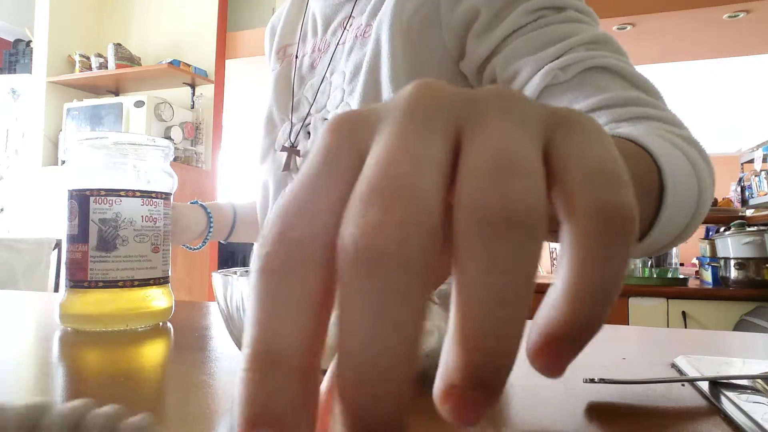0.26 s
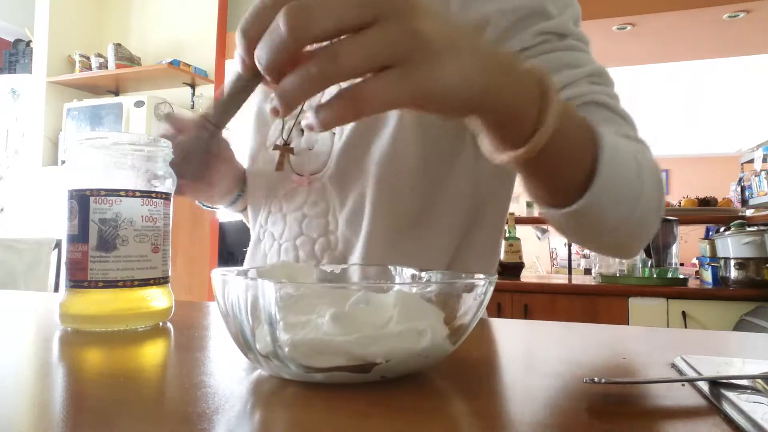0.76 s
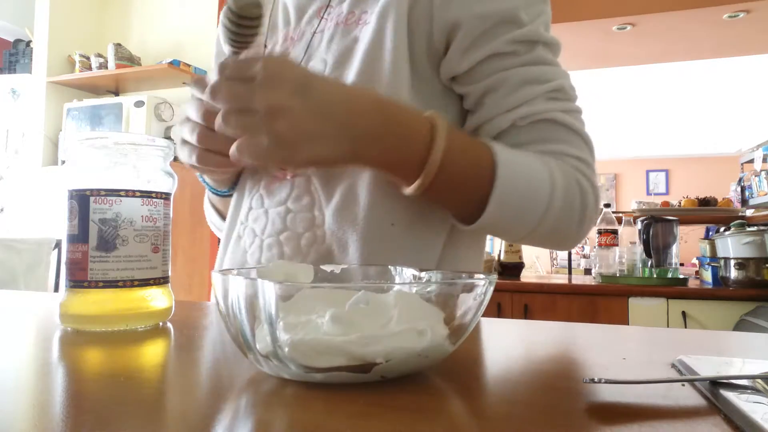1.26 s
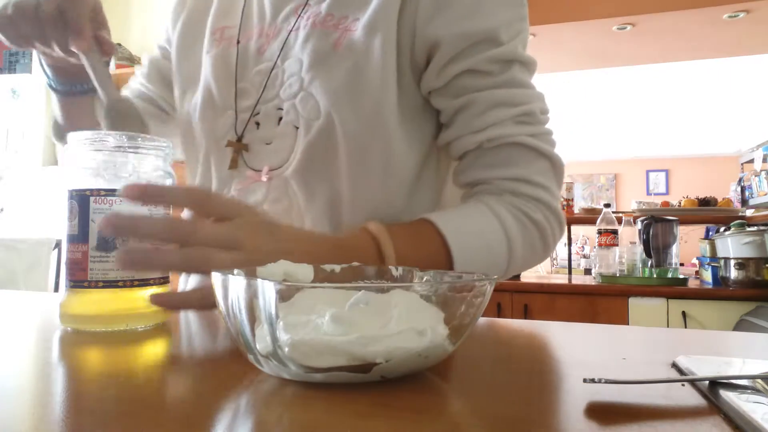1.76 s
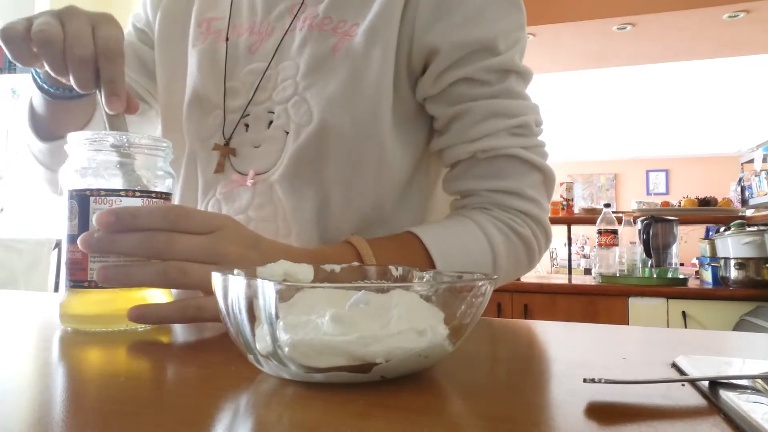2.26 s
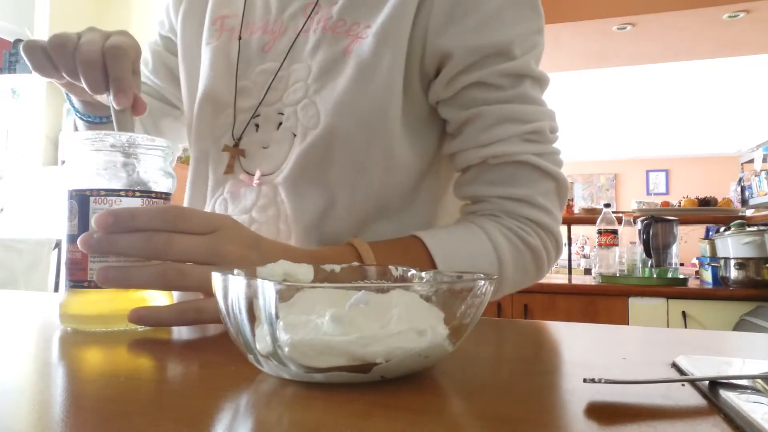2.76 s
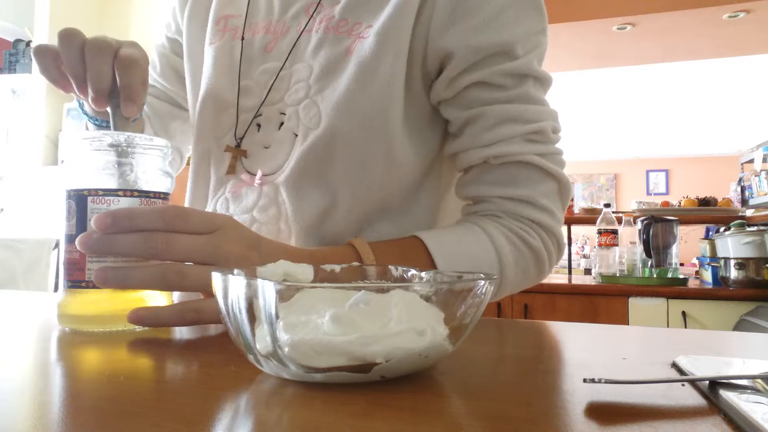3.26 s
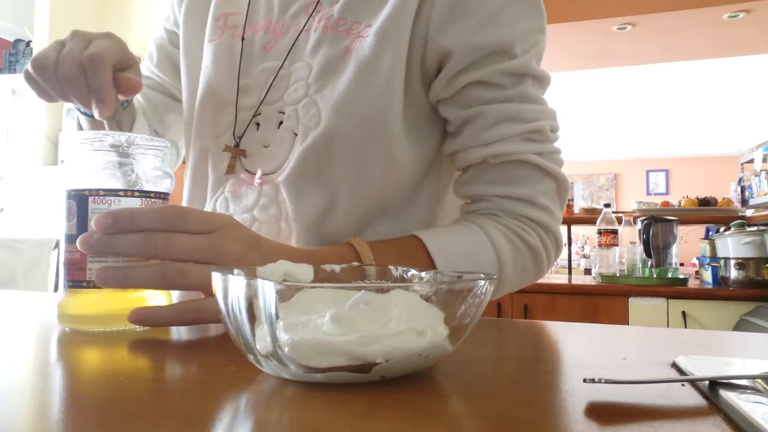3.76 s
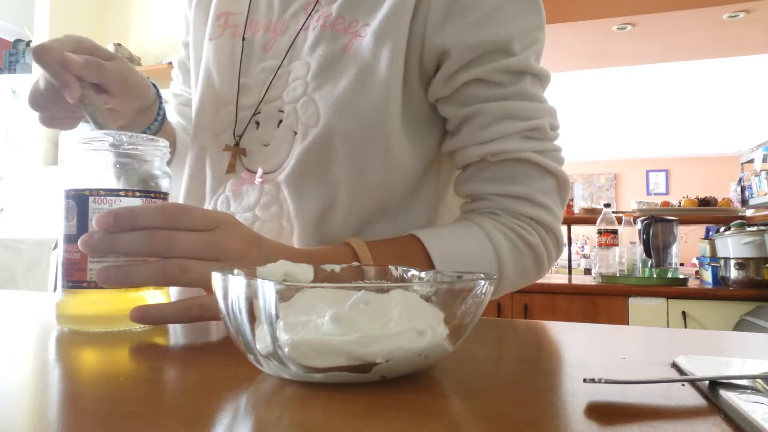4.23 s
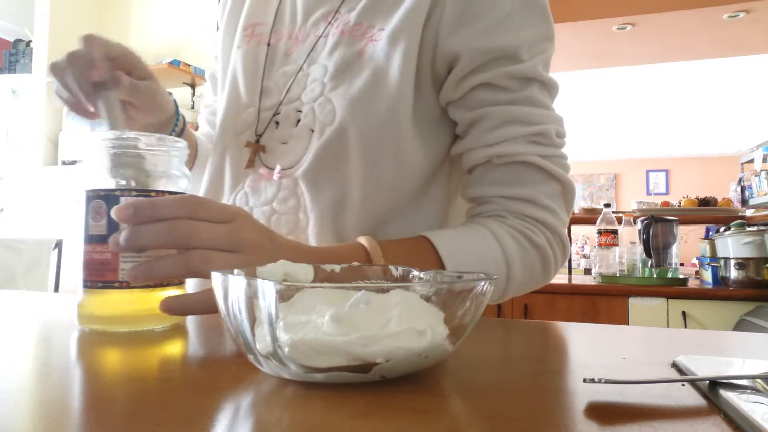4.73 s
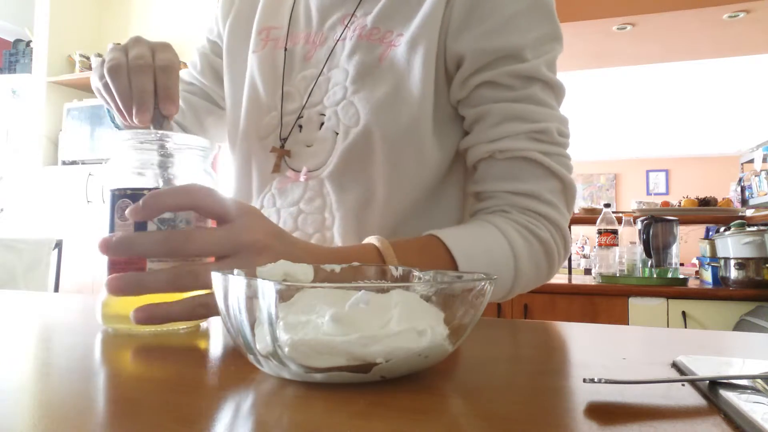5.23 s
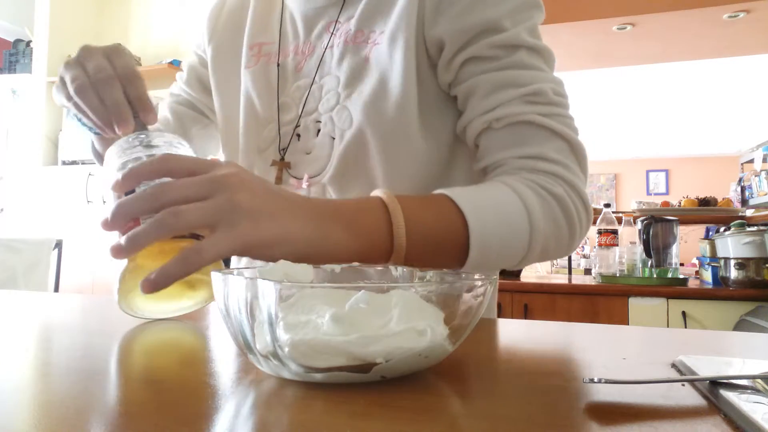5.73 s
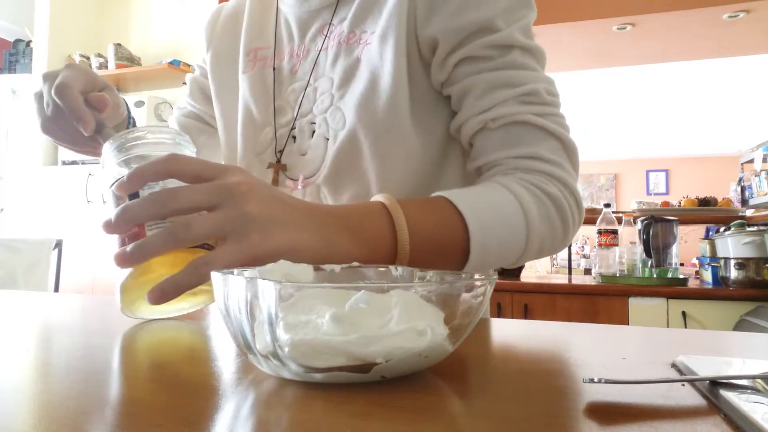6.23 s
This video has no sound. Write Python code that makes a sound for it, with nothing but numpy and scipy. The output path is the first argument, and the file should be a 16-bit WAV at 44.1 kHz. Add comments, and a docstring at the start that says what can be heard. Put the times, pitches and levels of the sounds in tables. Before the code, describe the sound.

Wooden knocks and a bright spoon clink, faint stirring in a glass jar, then dull bumps as the jar shifts on a table.

```python
"""Honey dipper, spoon and jar on a table

A wooden honey dipper is dragged off a wooden kitchen table, and a metal spoon clinks and bounces.
The dipper ticks on the rim of a glass jar and stirs; the jar rocks and slides on its base.
A phone lying on the table hears mostly the dull ring of the wood, over room rumble and microphone hiss."""
import sys
import numpy as np
from scipy import signal
from scipy.fft import rfft, irfft, next_fast_len
from scipy.io import wavfile
from scipy.ndimage import uniform_filter1d

SR = 44100
rng = np.random.default_rng(int(sys.argv[2]) if len(sys.argv) > 2 else 0)


def transcribe(u):
    """Save the signal u as a 16-bit wav file named by the first command-line argument.

    u: samples, shape (n,) or (channels, n), limited to [-1, 1]; the rate is SR.
    q: integer samples, one column per channel.
    """
    v = np.clip(np.atleast_2d(u).T, -1, 1)
    q = np.round(v * 32767).astype(np.int16)
    wavfile.write(sys.argv[1], SR, q)


N = 286209


def undb(db):
    """Turn decibels into a factor to multiply by."""
    return 10 ** (np.asarray(db) / 20)


def unit(x):
    """Scale a signal to an average power of 1."""
    return x / np.sqrt(np.mean(x ** 2))


def ring(push, hz, ring_s):
    """One tone of a pushed object; it takes ring_s to fade by 60 dB."""
    pole = np.exp(2j * np.pi * hz / SR - np.log(1000) / (ring_s * SR))
    return signal.lfilter([0, pole.imag], [1, -2 * pole.real, abs(pole) ** 2], push)


def blows(start_s, gains):
    """A one-sample push at each given moment."""
    x = np.zeros(N)
    np.add.at(x, np.round(np.asarray(start_s) * SR).astype(int), gains)
    return x


def curve(points):
    """Loudness gliding from point to point, silent before and after."""
    time_s, db = np.transpose(points)
    span = np.arange(int(time_s[0] * SR), min(int(time_s[-1] * SR), N))
    gain = np.zeros(N)
    gain[span] = undb(np.interp(span / SR, time_s, db))
    return gain


def waver(per_second):
    """A slow random wobble, made by smoothing noise twice."""
    width = SR // per_second
    return unit(uniform_filter1d(uniform_filter1d(rng.standard_normal(N), width), width))


def shaped_noise(points):
    """Noise with a chosen strength at each pitch."""
    hz, db = np.transpose(points)
    size = next_fast_len(N)
    bins_hz = np.arange(1, size // 2 + 2) * SR / size
    gain = undb(np.interp(np.log(bins_hz), np.log(hz), db))
    return unit(irfft(rfft(rng.standard_normal(size)) * gain, size)[:N])


def shares(db, hard_db, hollow_db, bright_db):
    """Levels for the table's bass, hollow, stiff and bright tones: a hard touch trades bass for highs."""
    return np.array([db - hard_db, db + hollow_db, db + hard_db, db + hard_db + bright_db])


def rubs(strokes, bright_db, rise_s, fall_db_per_s, sag_db_per_s=37):
    """Pressure on the four groups of tones: each rub swells, eases while held, then dies away."""
    t, out = np.arange(N) / SR, np.zeros((4, N))
    for start_s, hold_s, db, hard_db, hollow_db in strokes:
        age = t - start_s
        fade_db = -sag_db_per_s * age - fall_db_per_s * np.maximum(age - hold_s, 0)
        active = (age > -rise_s) & (fade_db > -60)
        swell = np.minimum(1 + age[active] / rise_s, 1) ** 2
        out[:, active] += swell * undb(shares(db, hard_db, hollow_db, bright_db)[:, None] + fade_db[active])
    return out


def slips(per_second, spread_db):
    """Rubbing surfaces stick and slip, making uneven clicks at random moments."""
    chance, size = rng.random(N), rng.standard_normal(N)
    return unit(size * undb(spread_db * np.abs(size)) * (chance < per_second / SR))


def crack(start_s, db, ring_s, band_hz):
    """The contact itself: a very short splash of treble."""
    fade = np.exp(-np.log(1000) / SR / ring_s)
    puff = signal.lfilter([1], [1, -fade], blows(start_s, undb(db))) * rng.standard_normal(N)
    return signal.sosfilt(signal.butter(2, band_hz, "band", fs=SR, output="sos"), puff)


def dipper_drag():
    """Pressure of the dipper rubbing over the wood."""
    # strokes of the dipper: start_s, hold_s, level_db, hardness_db, hollowness_db
    strokes = [(0.0, .004, -43.5, 1.5, 5.5), (0.26, .03, -62.5, -3, -0.5), (0.33, 0.035, -45.5, 10, 2.5),
               (0.4, .04, -57, -4.5, 8), (0.465, .02, -47, -3.5, 1), (0.745, 0.072, -29, 6.5, -2.5)]
    return rubs(strokes, bright_db=-17, rise_s=0.024, fall_db_per_s=447.5)


def table_top(drag, slide):
    """Knocks and rubbing ring the wood at two spots: at the front and under the jar."""
    # the table's own tones: pitch_hz, ring_s, front_db, under_jar_db
    tones = [(73, .12, -13.5, -14.5), (120, .12, -9, -1), (160, 0.071, -6, 1), (220.5, 0.086, -0.26, -2.47),
             (290, .06, -6, -5.5), (353.4, 0.25, -6.5, 1.5), (439, 0.088, -5, -4.5), (508, 0.053, -4, -2),
             (589, 0.14, -5, -6), (713, 0.065, -1.5, 3.5), (794, 0.067, -4, 2.5), (830, 0.066, 0.5, -1),
             (883, 0.015, 6.5, 11.5), (922, 0.05, -0.5, 6), (1030, 0.045, -5, 0), (1090, 0.07, -6, -2),
             (1246, 0.025, -10.5, -10), (1560, 0.0053, -3, -2), (1850, 0.013, 1.02, 0),
             (2250, 0.0098, 0.25, -4), (3170, 0.0068, -2.5, 0.5), (3420, 0.0094, -5.5, -7),
             (4430, 0.0054, -5.5, -11.5)]
    # blows at the front: start_s, level_db, hardness_db, hollowness_db
    front_knocks = [(0.454, -34.5, 7, -4), (0.461, -34, -5, -4), (0.478, -44, -3.5, -3.5),
                    (0.719, -27, 3.5, 1), (0.744, -16, 7, -5), (0.761, -24.5, 3.5, -0.5),
                    (0.782, -18.5, 5, -4), (0.786, -17.5, 5.5, -9), (0.796, -24.5, 7, 1),
                    (0.806, -24.5, 8, 6)]
    # the jar's base lands or rocks: start_s, level_db, hardness_db, hollowness_db
    jar_knocks = [(2.035, -45.5, -5, -11), (2.955, -65, -11, 0.5), (3.212, -59, 4, 5.5),
                  (3.344, -59.5, -9, 2), (3.497, -63.5, -16, -4), (3.836, -69, -14, 3.5),
                  (4.061, -58, -16.5, 4.5), (4.115, -58, -6, 4), (4.358, -27.5, -2, 3),
                  (4.506, -29, 2.5, 4), (4.546, -30, 0.3, 2.5), (4.708, -41.5, -1.2, -3.5),
                  (4.808, -28, 1, -3.5), (4.928, -27.5, -0.6, -6.5), (4.944, -37.5, 8, 7.5),
                  (4.991, -30.5, 1, -4), (5.074, -40.5, -4, 0), (5.104, -43.5, 7.5, -5),
                  (5.411, -44, -3.5, -9), (5.582, -38, -4, -16), (5.688, -45.5, -6, -5.5),
                  (5.727, -60.5, 7, -8), (5.893, -51.5, -7.5, -15), (6.32, -38.5, -6.5, -2),
                  (6.451, -52, -9, 1)]
    edges_hz = (0, 260, 490, 1450, 9000)  # around the bass, hollow, stiff and bright groups
    knock_db, rub_db = (-2.5, 0.5, -5.5, -3.5), (1.2, 0.5, 4.1, 0.76)  # how well each group responds
    pressed = 0.31  # a rubbing object shortens the ring to this share
    start_s, db, hard_db, hollow_db = np.transpose(front_knocks + jar_knocks)
    at_front = np.arange(len(start_s)) < len(front_knocks)
    push_db = shares(db, hard_db, hollow_db, bright_db=np.where(at_front, -10.5, -24))
    out = crack(start_s, push_db[3] + np.where(at_front, -6, -19), ring_s=0.019, band_hz=(2000, 6500))
    for group in range(4):
        low_hz, high_hz = edges_hz[group:group + 2]
        members = np.array([tone for tone in tones if low_hz < tone[0] < high_hz])
        # a rub's level is that of the steady ring it would keep up
        build_up = members[:, 1] * pressed * SR / np.log(1000) / 4
        steady_front, steady_jar = np.sqrt(build_up @ undb(members[:, 2:]) ** 2)
        grain = slips(per_second=2700, spread_db=2.0) * undb(rub_db[group])
        front_rub = grain * drag[group] / steady_front
        jar_rub = grain * slide[group] / steady_jar
        wood = 0
        for k, (hz, ring_s, front_db, jar_db) in enumerate(members):
            # every landing point rings each tone a little differently
            spot_db = np.where(at_front, front_db, jar_db) + 0.61 * rng.standard_normal(len(start_s))
            hit = blows(start_s, undb(push_db[group] + knock_db[group] + spot_db))
            rub = undb(front_db) * front_rub + undb(jar_db) * jar_rub
            wood += (-1) ** k * (ring(hit, hz, ring_s) + ring(rub, hz, pressed * ring_s))
        # a soft contact lasts too long to ring much above the group
        out += signal.sosfilt(signal.butter(2, 1.7 * high_hz, fs=SR, output="sos"), wood)
    return out


def struck(hits, tones, free_s, held_ring_s):
    """Where a blow lands favours some tones; after free_s the ring is held down and fades faster."""
    out, t = np.zeros(N + SR // 2), np.arange(SR // 2) / SR
    hz, tone_db, ring_s = np.transpose(tones)[:, :, None]
    fade_db = 60 * t / ring_s + 60 * np.maximum(t - free_s, 0) / held_ring_s
    rings = undb(tone_db - fade_db) * np.sin(2 * np.pi * hz * t)
    for start_s, db, favoured_hz, loss_db in hits:
        start = round(start_s * SR)
        octaves_away = np.abs(np.log2(hz[:, 0] / favoured_hz))
        out[start:start + len(t)] += undb(db - loss_db * octaves_away) @ rings
    return out[:N]


def spoon_clinks():
    """Metal clinks brightly; the table damps it at once, leaving a thin after-ring."""
    # the spoon's tones: pitch_hz, clink_db, clink_ring_s, after_db, after_ring_s
    tones = [(1440, -24.5, .1, -14, 0.35), (1858, -1, 0.11, -19.5, 0.23), (3414, 1, 0.14, -22, 0.4),
             (3504, -19.5, .1, -23.5, 0.34), (4829, -14.5, 0.072, -36, 0.23),
             (5740, -12, 0.059, -25.5, 0.18), (5830, -14, 0.11, -25, 0.45), (6500, -17.5, 0.087, -32, .15),
             (7130, -10.5, .07, -23.5, 0.15), (8350, -27.5, .05, -45.5, .15),
             (10350, -16.5, .07, -33.5, 0.37)]
    # the spoon is struck or jolted: start_s, level_db, favoured_hz, loss_db_per_octave
    hits = [(0.004, -64, 6070, 21), (0.032, -58.5, 5770, 27), (0.052, -66, 5770, 34.5),
            (0.345, -57, 5870, 30), (0.371, -62, 5770, 29), (0.462, -56, 7400, 13), (0.488, -53, 4830, 32),
            (0.571, -61.5, 5670, 42), (0.7181, -15.5, 3000, 1), (0.744, -34, 5670, 4),
            (0.766, -20.5, 4900, 29.5), (0.783, -41, 4000, 4)]
    clink = struck(hits, [tone[:3] for tone in tones], free_s=0.0069, held_ring_s=0.02)
    after = struck(hits, [(tone[0], *tone[3:]) for tone in tones], free_s=0.19, held_ring_s=0.36)
    start_s, db, _, loss_db = np.transpose(hits)
    return clink + after + crack(start_s, db - loss_db - 3.5, ring_s=0.044, band_hz=(1500, 7900))


def jar_ticks():
    """The dipper taps the glass, whose ring is cut short by honey and hand."""
    # the jar's tones: pitch_hz, level_db, ring_s
    tones = [(1101, 5.5, 0.02), (1960, 1, 0.006), (2480, -6.5, 0.021), (3343, -21, 0.021),
             (4280, -17, 0.032), (5700, -36, 0.026)]
    # taps on the rim: start_s, level_db, favoured_hz, loss_db_per_octave
    hits = [(1.9828, -48, 2200, 8), (2.012, -43, 2500, 6), (2.0356, -49, 2010, -1),
            (6.1556, -47.5, 1070, 6.5), (6.3218, -44, 4335, 15)]
    glass = struck(hits, tones, free_s=0.0072, held_ring_s=0.2)
    start_s, db, _, loss_db = np.transpose(hits)
    return glass + crack(start_s, db - loss_db - 11, ring_s=0.011, band_hz=(810, 4200))


def jar_slide():
    """Pressure of the jar's base sliding over the wood."""
    # slides of the jar: start_s, hold_s, level_db, hardness_db, hollowness_db
    strokes = [(2.05, 0.055, -54, -8.5, 1.2), (3.01, 0.047, -68, -2, -7.5), (3.22, .02, -69, -7, 10),
               (3.35, 0.019, -81, -14, 2), (3.53, 0.019, -68.5, -4, 3.5), (3.62, 0.051, -69.5, -7.5, -11),
               (3.85, .04, -65, -8.5, 3.5), (4.07, 0.053, -64.5, -8, 0.5), (4.18, .04, -67.5, -11.5, 0.5),
               (4.3, .04, -65, -6, 0), (4.47, 0.021, -67, -6, -3.5), (4.58, 0.018, -49.5, -2, 7.5),
               (4.65, 0.033, -55.5, -2.2, -13.5), (4.72, 0.096, -42, 1.5, -0.5),
               (4.84, 0.055, -43, -1, -0.5), (4.96, 0.14, -36.5, -0.5, -3), (5.31, 0.012, -37, -5, -6.5),
               (5.45, 0.02, -44, -7, -6.5), (5.49, .11, -39.5, -10, -9), (5.725, 0.064, -45, -8.5, -10),
               (5.909, 0.064, -54.5, -10, -18), (6.34, 0.027, -54, -14, -4), (6.46, .03, -53, -8, 5)]
    return rubs(strokes, bright_db=-21, rise_s=0.059, fall_db_per_s=304)


def stirring():
    """Faint, wavering pressure on the wood as stirring shakes the jar."""
    # strength of the shaking: time_s, level_db
    shaking = [(2.1, -65), (2.6, -69), (2.9, -71.5), (3.0, -63.5), (3.7, -67), (4.05, -68), (4.3, -55.5),
               (5.3, -53.5), (6.1, -69), (6.49, -58)]
    return undb(shares(0.5 * waver(20), hard_db=-5, hollow_db=-8, bright_db=-21)) * curve(shaking)


def room_echo(x, level_db=-13, dull_ring_s=0.22, bright_ring_s=0.18, rise_s=0.0035):
    """Add a short kitchen echo that gets duller as it fades."""
    t = np.arange(SR // 2) / SR
    bright, dull = rng.standard_normal((2, len(t)))
    dull = signal.lfilter([0.4], [1, -0.6], dull)
    tail = dull * undb(-60 * t / dull_ring_s) + 0.35 * bright * undb(-60 * t / bright_ring_s)
    tail *= np.minimum(t / rise_s, 1)
    return x + undb(level_db) * signal.fftconvolve(x, tail / np.sqrt(np.sum(tail ** 2)))[:N]


def background():
    """Room rumble that wavers a little, and microphone hiss."""
    # tone colour of the rumble: pitch_hz, level_db
    rumble_colour = [(18, -48.5), (30, -17.5), (86, -3.5), (140, -10), (177, -0.5), (197, -15.5),
                     (255, -12), (284, -14), (883, -25), (3470, -41), (5000, -42.5), (6500, -68.5),
                     (11000, -120)]
    # tone colour of the hiss: pitch_hz, level_db
    hiss_colour = [(880, -29), (1500, -0.5), (2250, -5), (2450, -4), (3470, -10.5), (6080, -12), (8750, -7),
                   (15000, -6.5), (15800, -7)]
    # the hiss swells and dips: time_s, level_db
    hiss_swell = [(0.0, -74.5), (0.7, -74.5), (0.81, -67.5), (1.19, -83), (1.5, -84.5), (1.97, -81.5),
                  (2.24, -77), (4.07, -76), (4.92, -70), (5.24, -72), (5.66, -71.5), (6.02, -75),
                  (6.49, -74.5)]
    rumble = undb(-69.5 + 1.6 * waver(8)) * shaped_noise(rumble_colour)
    hiss = undb(2.5) * curve(hiss_swell) * shaped_noise(hiss_colour)
    return rumble + hiss


def scene():
    """Wood, metal and glass sound in the kitchen, on one channel."""
    wood = table_top(dipper_drag(), jar_slide() + stirring())
    return (room_echo(wood + spoon_clinks() + jar_ticks()) + background())[None]


def record(dry, low_hz=54, high_hz=15780):
    """The phone cuts the deepest bass and the highest treble."""
    x = signal.sosfilt(signal.butter(4, low_hz, "high", fs=SR, output="sos"), dry)
    return signal.sosfilt(signal.ellip(10, 0.2, 80, high_hz, fs=SR, output="sos"), x)


dry = scene()
out = record(dry)
transcribe(out)
```